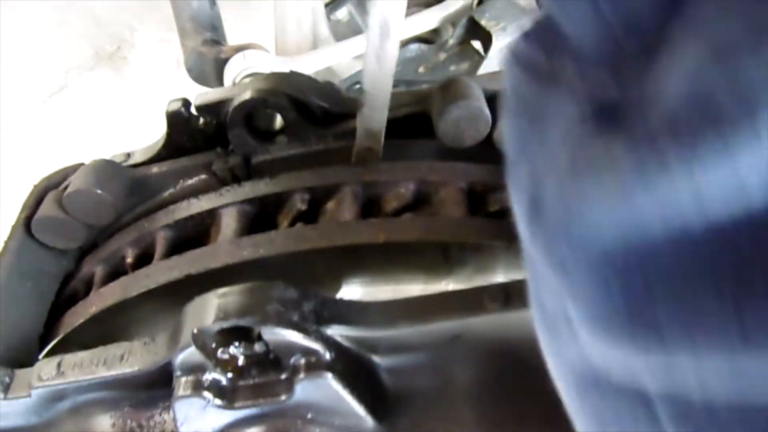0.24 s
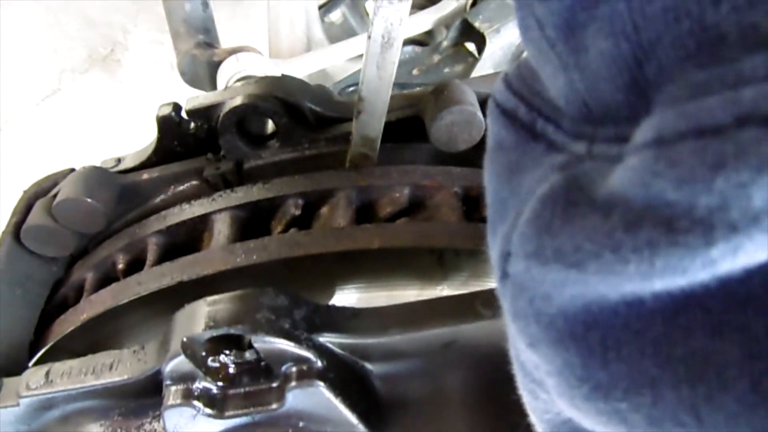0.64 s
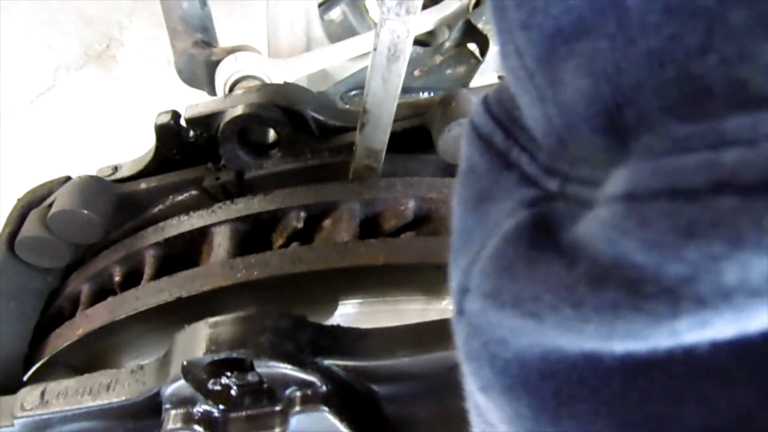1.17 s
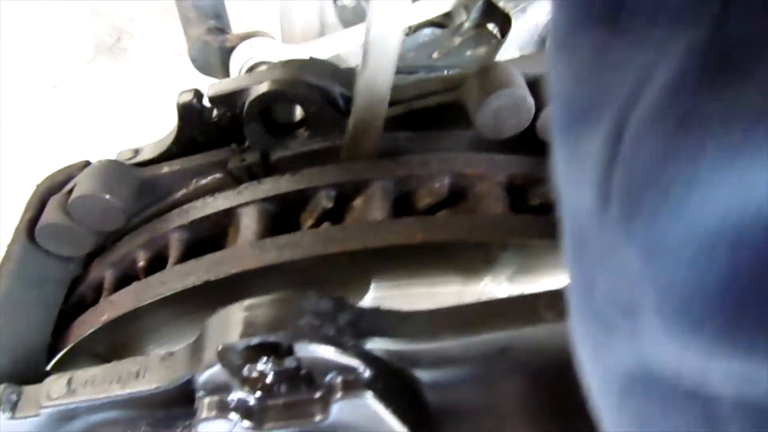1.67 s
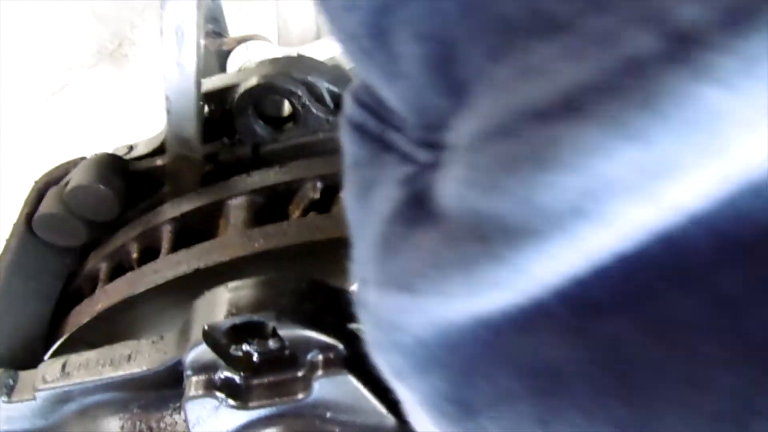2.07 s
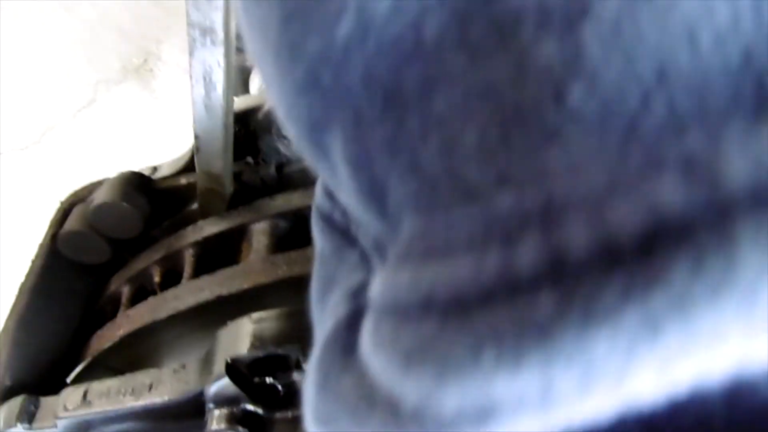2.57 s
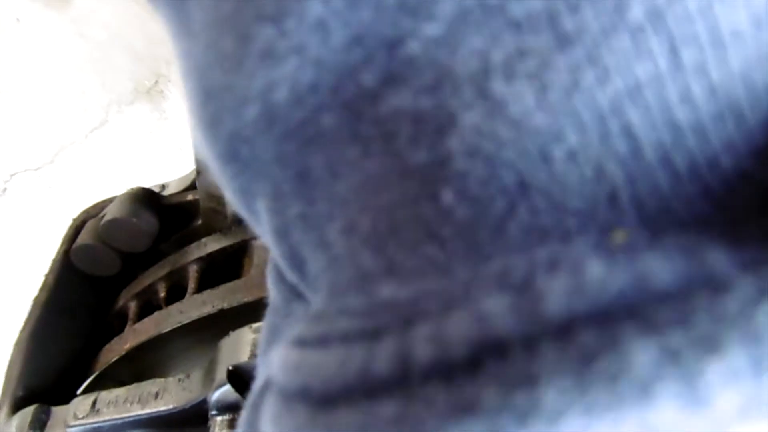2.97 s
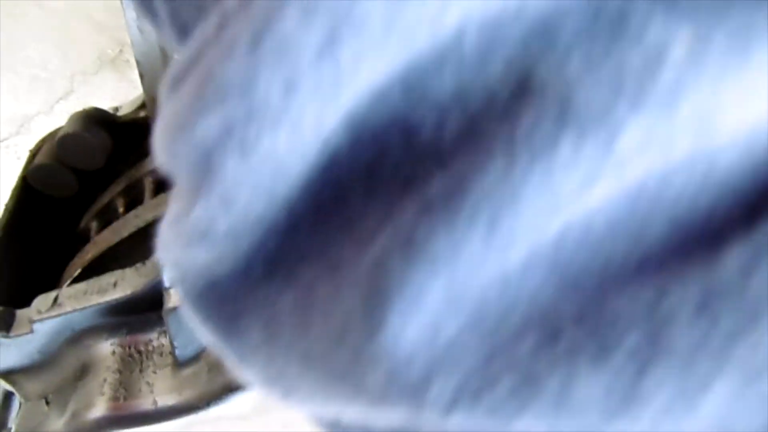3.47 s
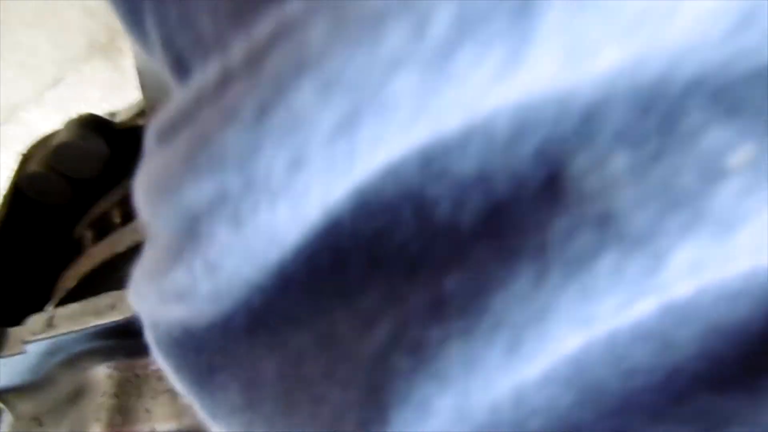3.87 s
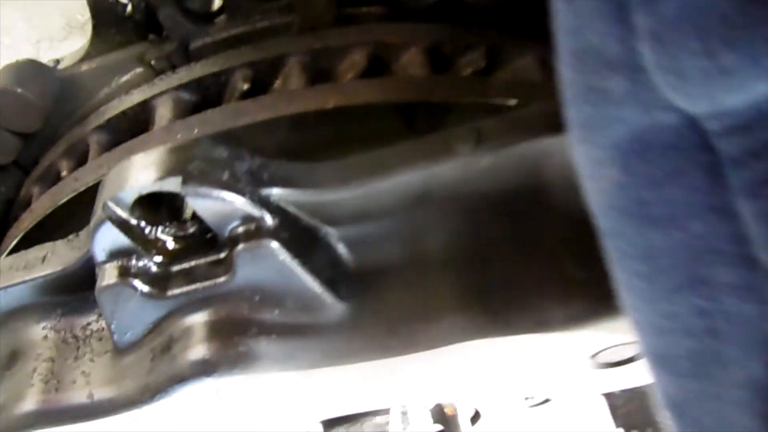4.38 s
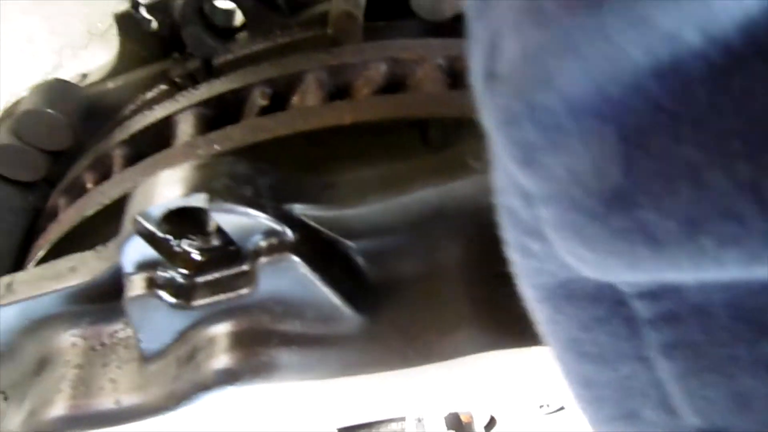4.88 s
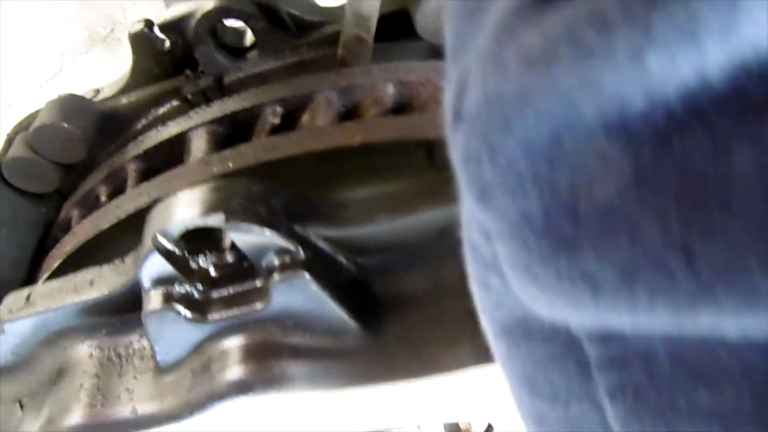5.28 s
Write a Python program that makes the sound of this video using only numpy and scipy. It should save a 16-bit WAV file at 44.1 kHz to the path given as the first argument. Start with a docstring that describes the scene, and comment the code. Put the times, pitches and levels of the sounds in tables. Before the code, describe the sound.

Close metallic clinks, dull clacks and brief rusty scrapes as a screwdriver levers back a car's brake pad, over soft hiss.

```python
"""Levering back a brake pad

A quiet workshop, the microphone close to the caliper, where a large screwdriver levers the pad back.
Loose blows leave the steel parts ringing; blows under pressure only clack; each one thumps the casting.
The tip scrapes over rusty iron and squeaks once as it slides off, and the caliper bumps on its pins.
Behind the work lie a soft hiss, a low rumble, a far whirr and a faint echo of wheel arch and room."""
import sys
import numpy as np
from scipy import signal
from scipy.fft import rfft, irfft
from scipy.io import wavfile

SR = 44100
rng = np.random.default_rng(int(sys.argv[2]) if len(sys.argv) > 2 else 0)


def to_wav(sig):
    """Store sig (one row per channel, or 1-D mono) as 16-bit WAV at the path in sys.argv[1].

    Samples outside -1..1 are clipped; the rate is SR.
    """
    pcm = np.clip(np.atleast_2d(sig), -1, 1) * 32767
    pcm = np.round(pcm).astype(np.int16)
    wavfile.write(sys.argv[1], SR, pcm.T)  # frames by channels


N = 244049

# spectrum of the room's hiss: frequency_hz, relative_db
HISS_SPECTRUM = [(12, -35), (20, -1), (91, -9.5), (123, -6), (161, -12.5), (216, -11), (262, -10),
                 (304, -12), (461, -14), (734, -12), (1140, -12.5), (1260, -10.5), (1390, -16),
                 (6350, -18.5), (7000, -24), (9100, -56), (15400, -120)]
# drift of the low rumble: time_s, level_db
RUMBLE_LEVELS = [(0.0, -65.5), (1.83, -66), (3.39, -72.5), (4.82, -70.5), (5.02, -80.5), (5.53, -68.5)]
# ringing modes, one list each for bracket, disc, blade and pad: pitch_hz, relative_db, t60_s
STEEL_MODES = [
    [(853, 0, .33), (282, -16, .4), (605, -13, .16), (1082, -16, .25), (1505, -14, .2)],
    [(1927, 0, .21), (2310, -21, .15), (2368, -15, .24)],
    [(3066, 0, .24), (2362, -3, .08), (4372, -9, .22), (5395, -20, .16), (6024, -26, .18)],
    [(4085, 0, .23), (4160, -7, .08), (5400, -15, .09), (6020, -15, .1), (6584, -18, .14), (6702, -21, .14)],
]
# quickly damped modes of the loaded caliper: pitch_hz, relative_db, t60_s
CALIPER_MODES = [(513.4, -12.5, 0.065), (600, -17.5, 0.12), (709, -7.5, 0.073), (860, -8.5, 0.062),
                 (1077, -13, 0.049), (1195, -23, 0.0073), (1467, -2, 0.018), (1578, -6.5, 0.025),
                 (1816, -16.5, 0.091), (2260, -15, 0.11), (2403, 3.5, 0.013), (2804, -5, 0.012),
                 (3167, -6.5, 0.033), (3464, 2.5, 0.014), (4310, -9, 0.011), (4330, -11, 0.01),
                 (5150, -7.5, 0.031), (5260, -22, 0.0092), (5720, -20, 0.054), (6400, -31.5, 0.0056),
                 (6330, -9.5, 0.021)]
# how the ring is shared out, by the spot struck: bracket_db, disc_db, blade_db, pad_db
RING_SHARES = {"bracket": (-6, 0, -16, -17.5), "disc": (-22.5, -1, -11.5, -22.5),
               "blade": (-15, -10, -1.5, -26), "pad": (-9.5, -6.5, -13.5, -2)}
# the caliper shifting on its pins: start_s, level_db, pitch_hz, decay_s
PIN_BUMPS = [(0.104, -50, 317, 0.029), (2.161, -55.5, 310, 0.022), (4.490, -53, 121, 0.0079),
             (4.831, -55, 260, 0.024), (4.843, -50.5, 116, 0.029)]
# the tip sliding off: peak_s, level_db, pitch_hz, half_length_s
TIP_SQUEAK = (4.846, -58, 6800, .016)
# the tip dragged over the iron: peak_s, length_s, level_db, centre_hz
RUST_SCRAPES = [ (0.072, 0.015, -42, 2600), (0.092, 0.027, -48, 3800), (0.272, 0.027, -58, 4440),
                (0.471, 0.056, -59, 2530), (1.641, .025, -42, 1980), (1.961, 0.031, -51.5, 4460),
                (2.042, .055, -47, 1900), (2.12, .144, -51, 1700), (2.442, 0.023, -61, 2580),
                (4.142, 0.068, -56.5, 900), (4.197, 0.037, -49.5, 810), (4.82, 0.071, -59, 2460)]
# dead knocks with the tip pressed home: start_s, level_db, low_hz, high_hz, grind_s, rebounds
PRESSED_KNOCKS = [ (0.0215, -41, 450, 1050, 0.0045, True), (0.0985, -46, 600, 1300, 0.0064, False),
                  (0.4237, -54, 600, 800, 0.0025, False), (1.6201, -47.5, 1496, 2500, 0.0083, False),
                  (1.7383, -32, 1150, 4300, 0.001, False), (1.848, -33.5, 950, 4400, .0015, True),
                  (1.9287, -32, 1260, 3020, 0.0055, False), (2.1538, -48.5, 503, 1600, 0.0066, False),
                  (2.5552, -53, 2920, 6800, 0.00011, False), (2.6964, -58, 600, 2260, 0.0028, False),
                  (3.051, -55.5, 1230, 2050, 0.0043, False), (4.018, -50, 543, 1500, 0.0078, False),
                  (4.1879, -37, 3900, 9000, 0.0061, False), (4.4505, -43, 800, 1600, 0.0048, False),
                  (4.4820, -34.5, 564, 880, 0.0086, False), (4.5847, -47, 644, 1150, 0.0041, True),
                  (4.624, -56.5, 600, 4060, .004, False), (4.7380, -55.5, 1390, 2250, 0.0045, False),
                  (4.8170, -54, 650, 990, 0.0088, False)]
# blows that leave the steel ringing: start_s, spot, clack_db, ring_db, centre_hz, grind_s
LOOSE_BLOWS = [ (0.0083, "blade", -41, -46, 3350, 0.000074), (0.0940, "bracket", -38, -46, 1830, 0.0037),
               (1.6291, "blade", -43.5, -42, 1740, .008), (1.6475, "blade", -33, -35, 1980, 0.0057),
               (1.8128, "pad", -20.5, -33, 2890, 0.00014), (1.9129, "pad", -26.5, -36.5, 2650, 0.000082),
               (1.975, "bracket", -61, -45.5, 1310, 0.0084), (2.1458, "bracket", -45.5, -50, 1400, 0.004),
               (4.0401, "disc", -36, -27.5, 1910, 0.0088), (4.0489, "disc", -39.5, -28, 2100, 0.011),
               (4.2476, "blade", -42.5, -53, 3170, 0.0073), (4.4340, "disc", -36, -26, 1930, 0.0014),
               (4.4805, "bracket", -33, -37, 2110, 0.0034)]


def undb(db):
    """Decibels to gain."""
    return 10 ** (np.asarray(db) / 20)


def unit(x):
    """Scale to rms 1."""
    return x / np.sqrt(np.mean(x ** 2))


def seconds(length_s):
    """Time axis of a sound."""
    return np.arange(int(length_s * SR)) / SR


def band(x, low_hz, high_hz, order=2):
    """High-pass and low-pass in series."""
    for hz, kind in ((low_hz, "high"), (high_hz, "low")):
        x = signal.sosfilt(signal.butter(order, min(hz, SR / 2 - 1), kind, fs=SR, output="sos"), x)
    return x


def edges(centre_hz, octaves):
    """Low and high edge of a band."""
    return centre_hz / 2 ** (octaves / 2), centre_hz * 2 ** (octaves / 2)


def add(out, start_s, x):
    """Mix a sound in at a time."""
    i = max(int(start_s * SR), 0)
    out[i:i + len(x)] += x[:N - i]


def at_level(x, level_db, over_s=0.01):
    """Give a short sound the energy of this level held for over_s."""
    return x * undb(level_db) / np.sqrt(np.sum(x ** 2) / (SR * over_s))


def room_tone(hiss_db=-63, whirr_db=-80, whirr_hz=1245):
    """The quiet workshop: even hiss, a drifting low rumble and a faint whirr far from the microphone."""
    hz, db = np.transpose(HISS_SPECTRUM)
    bins_hz = np.arange(N // 2 + 1) * SR / N
    colour = undb(np.interp(np.log(bins_hz + 1), np.log(hz), db))
    hiss = irfft(rfft(rng.standard_normal(N)) * colour, N)
    rumble = band(rng.standard_normal(N), 55, 90, order=3)
    rumble_db = np.interp(np.arange(N) / SR, *np.transpose(RUMBLE_LEVELS))
    whirr = signal.lfilter(*signal.iirpeak(whirr_hz, Q=18, fs=SR), rng.standard_normal(N))
    return undb(hiss_db) * unit(hiss) + undb(rumble_db) * unit(rumble) + undb(whirr_db) * unit(whirr)


def workshop_echo(x, wet_db=-27, low_t60_s=0.91, high_t60_s=0.27, low_db=-2, onset_s=0.012):
    """Diffuse echo of wheel arch and room, faint this close to the work; the lows stay longest."""
    t = seconds(0.42)
    low = band(rng.standard_normal(len(t)), 150, 1300) * undb(low_db - 60 * t / low_t60_s)
    high = band(rng.standard_normal(len(t)), 1000, 3000) * undb(-60 * t / high_t60_s)
    echo = (low + high) * np.clip(t / onset_s - 0.5, 0, 1)
    return signal.fftconvolve(x, undb(wet_db) * echo / np.sqrt(np.sum(echo ** 2)))[:N]


def casting_thump(level_db, pitch_hz, decay_s):
    """A soft low bump of the heavy casting."""
    t = seconds(0.2)
    push = rng.standard_normal(len(t)) * np.exp(-t / decay_s)
    return at_level(band(push, 0.93 * pitch_hz, 0.9 * pitch_hz, order=3), level_db)


def pin_bumps():
    """The caliper gives way and bumps on its pins."""
    out = np.zeros(N)
    for start_s, level_db, pitch_hz, decay_s in PIN_BUMPS:
        add(out, start_s, casting_thump(level_db, pitch_hz, decay_s))
    return out


def tip_squeak(waver=0.012):
    """Sliding off, the tip sticks and slips fast enough to whistle for a moment."""
    peak_s, level_db, pitch_hz, half_length_s = TIP_SQUEAK
    wavering_hz = pitch_hz * (1 + waver * unit(band(rng.standard_normal(N), 18, 400)))
    envelope = np.exp(-((np.arange(N) / SR - peak_s) / half_length_s) ** 2)
    return undb(level_db) * envelope * np.sin(2 * np.pi * np.cumsum(wavering_hz) / SR)


def ring(modes, t, pitch_ratio=1, sustain=1, tilt_db_per_octave=0):
    """Decaying modes of struck metal; neighbours swing in opposite directions."""
    out = np.zeros(len(t))
    for k, (hz, db, t60_s) in enumerate(modes):
        struck_db = db + tilt_db_per_octave * np.log2(hz / modes[0][0])
        envelope = undb(struck_db - 60 * t / (t60_s * sustain))
        out += (-1) ** k * envelope * np.sin(2 * np.pi * hz * pitch_ratio * t)
    return out


def grit(size):
    """Dense tiny slips, some stronger than the rest."""
    return unit(rng.standard_normal(size) * undb(2.5 * rng.exponential(size=size)))


def caliper_response(pitch_ratio, tick_db=23, crack_db=1, crack_s=0.0014):
    """The tapped caliper: a direct tick, its damped modes and a crack of countless others."""
    t = seconds(0.1)
    crack = undb(crack_db) * rng.standard_normal(len(t)) * np.exp(-t / crack_s)
    return undb(tick_db) * (t == 0) + ring(CALIPER_MODES, t, pitch_ratio) + crack


def rust_scrapes(ring_db=-27, rise_share=0.66):
    """Rust grains catch the tip; they shake the caliper and faintly ring the other parts."""
    out, t = np.zeros(N), seconds(0.44)
    steel = undb(ring_db) * sum(ring(modes, t) for modes in STEEL_MODES)
    # light grains are heard more directly than through the modes
    add(steel, 0, caliper_response(pitch_ratio=0.95, tick_db=26.5))
    for peak_s, length_s, level_db, centre_hz in RUST_SCRAPES:
        stroke_t, rise_s = seconds(length_s), rise_share * length_s
        force = np.interp(stroke_t, [0, rise_s, length_s], [0, 1, 0]) * grit(len(stroke_t))
        scrape = band(signal.fftconvolve(force, steel), *edges(centre_hz, octaves=1.3), order=3)
        add(out, peak_s - rise_s, at_level(scrape, level_db, over_s=length_s / 2))
    return out


def tip_clack(level_db, low_hz, high_hz, grind_s, pitch_ratio, grind_db=-17):
    """The tip lands, then grinds to rest; the firmness of the contact sets the band it excites."""
    t = seconds(0.1)
    force = undb(grind_db) * grit(len(t)) * np.exp(-t / grind_s)
    force[0] += 1  # the landing
    clack = signal.fftconvolve(force, caliper_response(pitch_ratio))
    return at_level(band(clack, low_hz, high_hz, order=3), level_db)


def blow(level_db, low_hz, high_hz, grind_s, pitch_ratio=1, casting_hz=343, lag_s=0.00757):
    """A clack shakes the casting a moment later, the more the lower its band reaches."""
    out = np.zeros(N)
    add(out, 0, tip_clack(level_db, low_hz, high_hz, grind_s, pitch_ratio))
    octaves_above_casting = np.log2(low_hz / casting_hz)
    thump_db = level_db - 6 - 9.5 * octaves_above_casting
    add(out, lag_s, casting_thump(thump_db, casting_hz, decay_s=0.071))
    return out


def pressed_knocks(stray_per_s=4.6, rebound_s=0.0185, rebound_db=-5.5):
    """Clacks of the loaded caliper, with no free ring; on some the tip lands again, weaker."""
    out = np.zeros(N)
    for start_s, level_db, low_hz, high_hz, grind_s, rebounds in PRESSED_KNOCKS:
        # the longer the tip slides, the more the caliper's pitch strays
        first_ratio, rebound_ratio = 1 + stray_per_s * grind_s * rng.uniform(-1, 1, size=2)
        add(out, start_s, blow(level_db, low_hz, high_hz, grind_s, first_ratio))
        if rebounds:
            rebound = blow(level_db + rebound_db, low_hz, high_hz, grind_s, rebound_ratio)
            add(out, start_s + rebound_s, rebound)
    return out


def loose_blows(choke_s=0.0039, swell_share=0.29, pitch_bend=0.003):
    """Each loose blow clacks and sets the four parts ringing until the next one chokes them."""
    out, t = np.zeros(N), seconds(0.52)
    next_starts = [row[0] for row in LOOSE_BLOWS[1:]] + [N / SR]
    for (start_s, spot, clack_db, ring_db, centre_hz, grind_s), next_s in zip(LOOSE_BLOWS, next_starts):
        hand_pressure = unit(band(rng.standard_normal(len(t)), 4, 70))
        bent_t = t + pitch_bend * np.cumsum(hand_pressure) / SR  # shifting pressure bends the pitch
        tilt = 5 - 1007.5 * grind_s  # a clean hit rings bright; a longer contact dulls it
        steel = sum(undb(ring_db + share_db) * ring(modes, bent_t, sustain=1.14, tilt_db_per_octave=tilt)
                    for share_db, modes in zip(RING_SHARES[spot], STEEL_MODES))
        build_up = 1 - np.exp(-t / (swell_share * grind_s))  # the ring grows while the tip still grinds
        choke = np.exp(-np.maximum(start_s + t - next_s, 0) / choke_s)
        add(out, start_s, steel * build_up * choke)
        add(out, start_s, blow(clack_db, *edges(centre_hz, octaves=0.83), grind_s))
    return out


def scene():
    """The work on the brake close to one microphone, with the workshop behind it."""
    work = loose_blows() + pressed_knocks() + rust_scrapes() + pin_bumps() + tip_squeak()
    return (work + workshop_echo(work) + room_tone())[None]


def record(dry):
    """A narrow-band recorder cuts the top."""
    top_hz = 7350
    taps = signal.firwin(161, top_hz, window=("kaiser", 7), fs=SR)
    return signal.fftconvolve(dry, taps[None], mode="same", axes=1)


dry = scene()
out = record(dry)
to_wav(out)
```